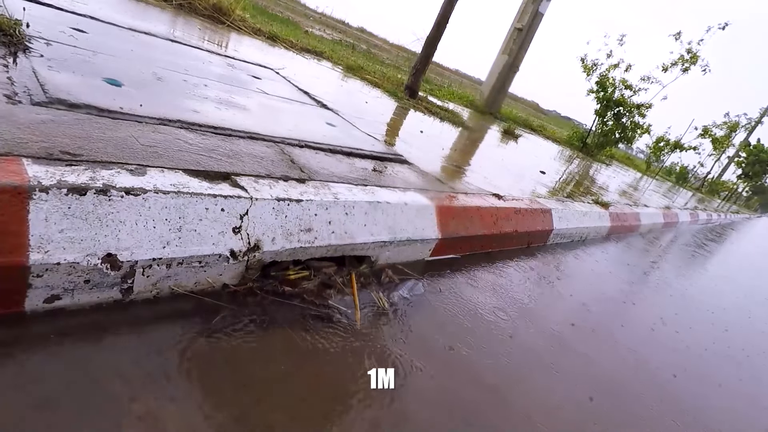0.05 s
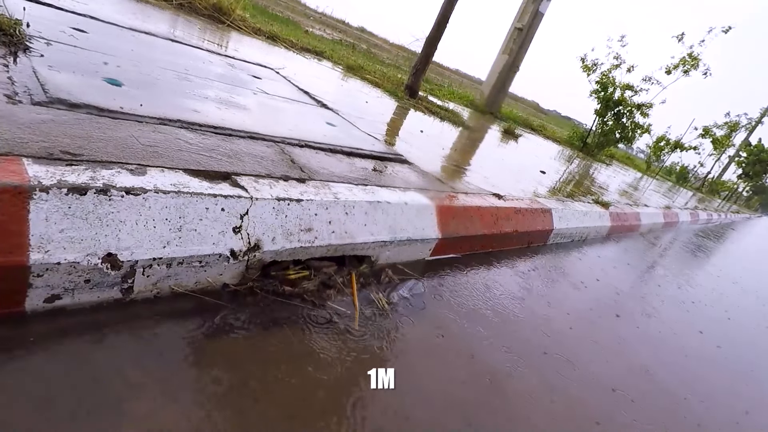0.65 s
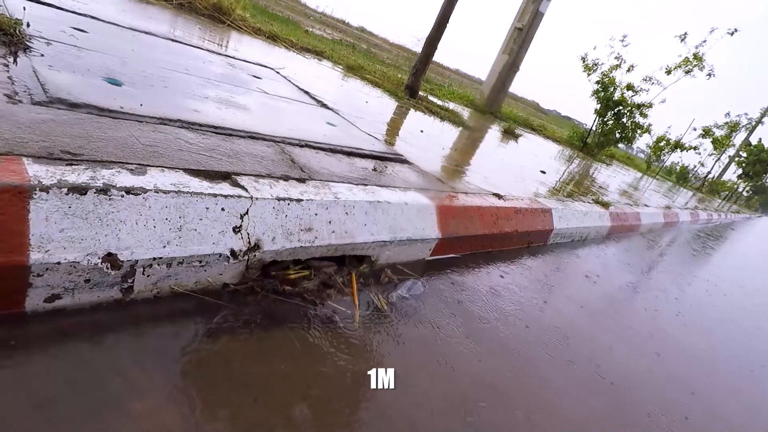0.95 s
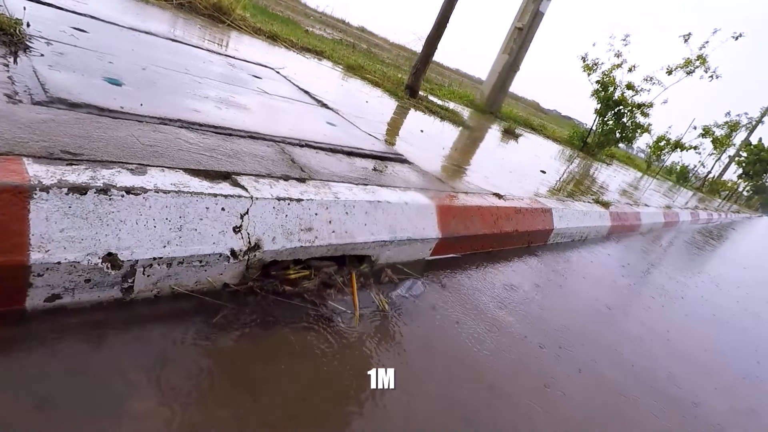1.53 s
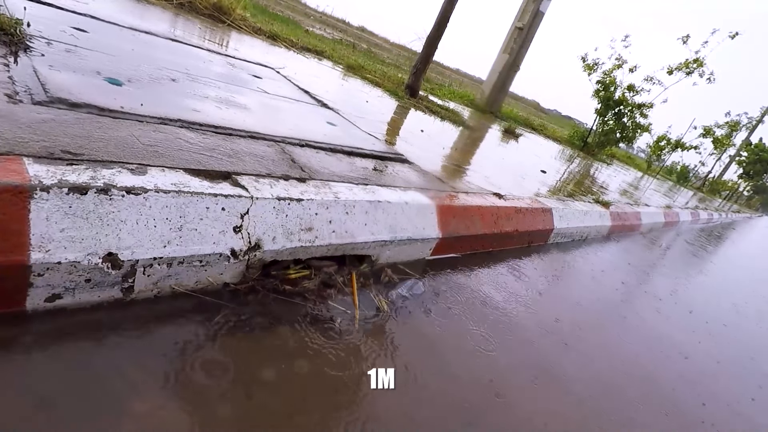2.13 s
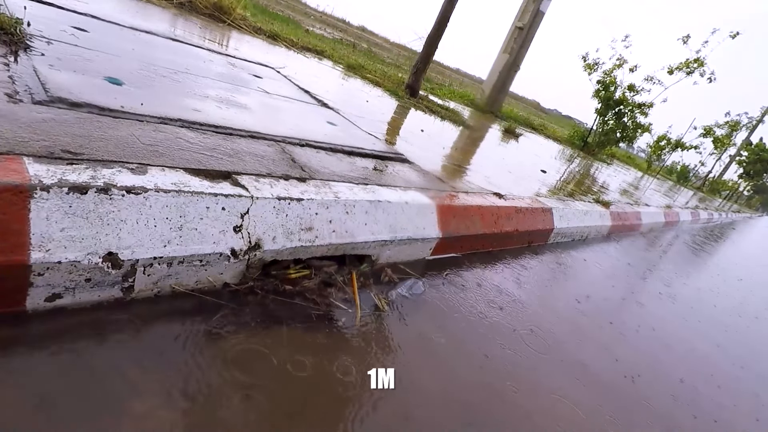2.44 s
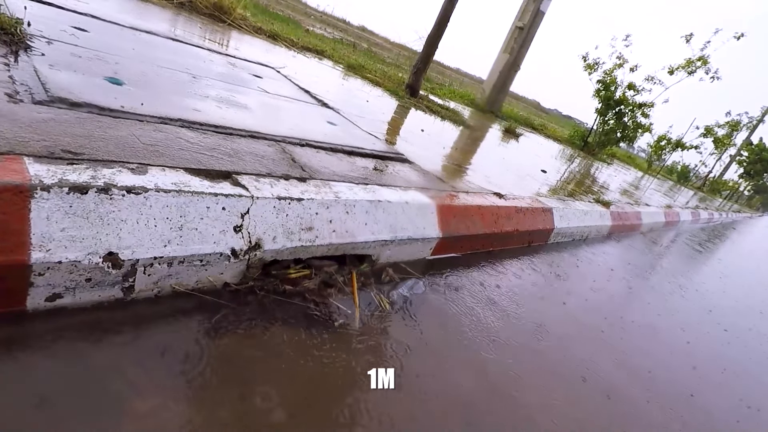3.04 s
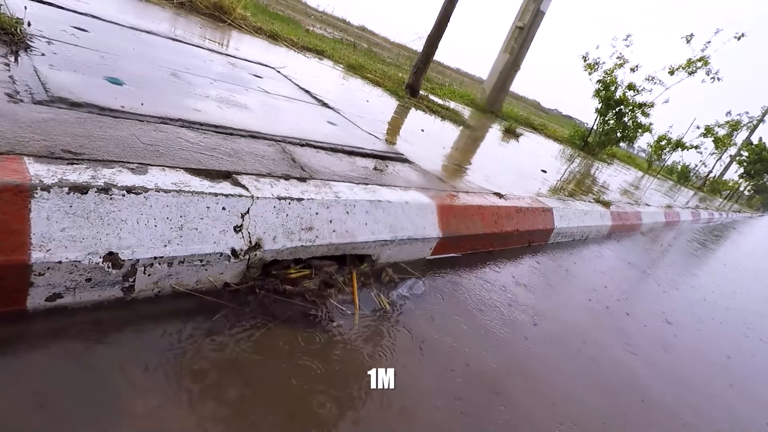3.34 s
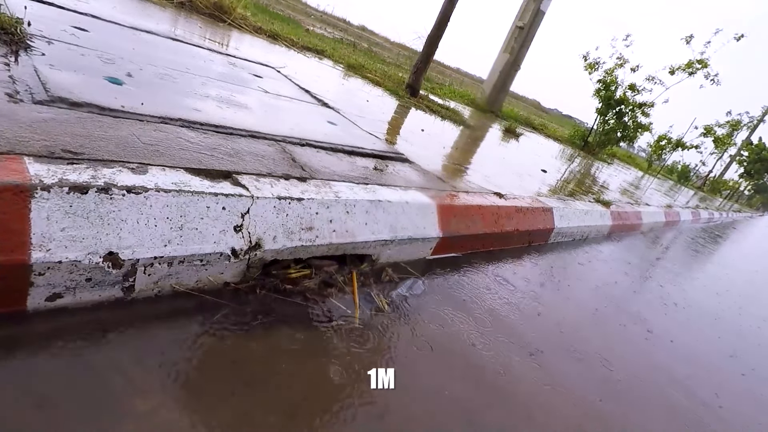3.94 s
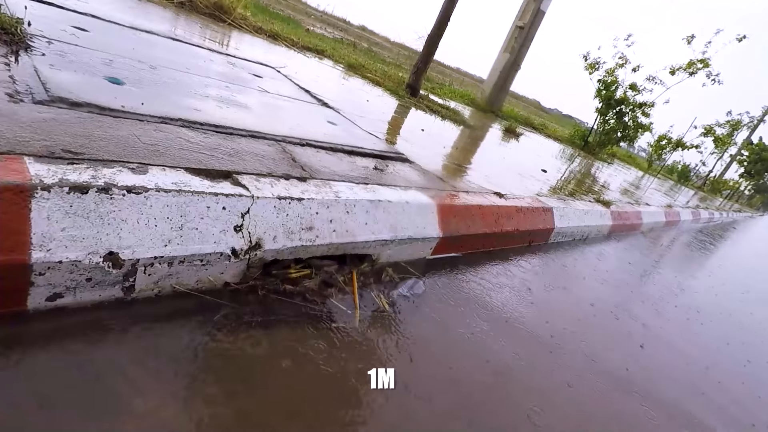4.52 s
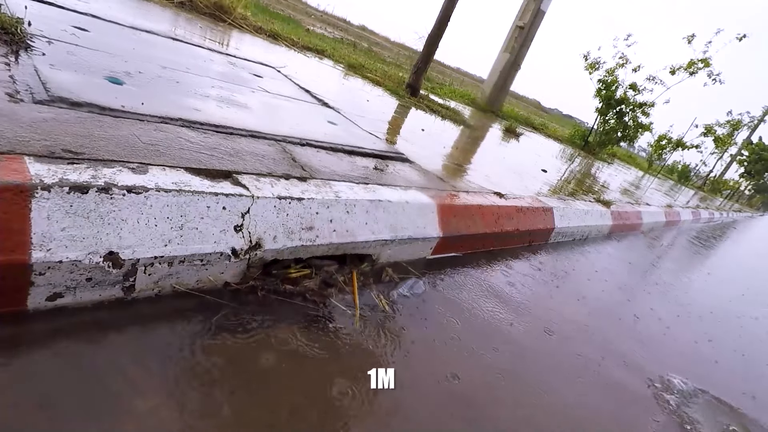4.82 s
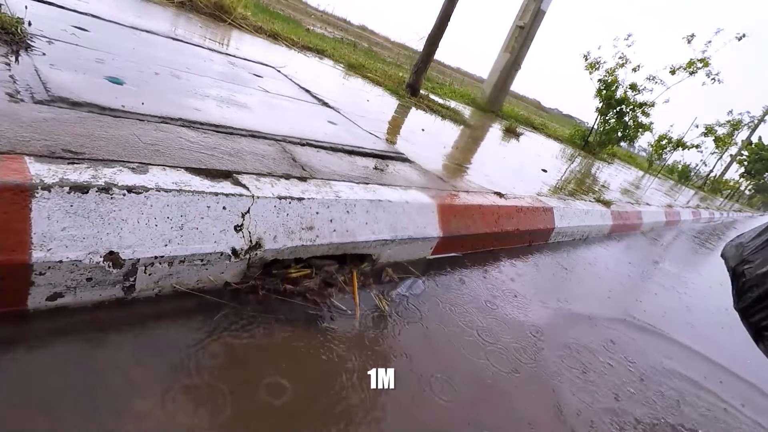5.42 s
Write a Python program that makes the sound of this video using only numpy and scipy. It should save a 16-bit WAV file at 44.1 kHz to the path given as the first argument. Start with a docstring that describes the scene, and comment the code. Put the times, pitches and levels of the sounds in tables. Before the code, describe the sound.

Light rain taps on a microphone held just above a flooded kerb. Behind the taps, water runs along the gutter, an engine idles low and tyres hiss on a distant wet road. After a quick, hard rattle the sound drops almost to nothing, then creeps back with trickling and bubbling at a drain. A breeze rumbles, and near the end a foot wades in with a plop and a wash of spray.

```python
"""A flooded kerb in light rain, heard from just above the water. Raindrops pat on the microphone
housing and ring it; after a quick, hard rattle the level collapses and creeps back, for a while in mono.
Water slides into the drain with ringing bubbles, and near the end a foot wades in with a plop and a
wash of spray. Behind it an exhaust throbs at idle, wet tyres hiss far off and a breeze rumbles."""
import sys
import numpy as np
from scipy import signal
from scipy.io import wavfile

SR = 44100
rng = np.random.default_rng(int(sys.argv[2]) if len(sys.argv) > 2 else 0)


def output_pcm(signal):
    """Save a mono or channel-first signal as 16-bit PCM at the path in sys.argv[1].

    Samples are clipped to [-1, 1] before scaling.
    """
    pcm = np.clip(np.atleast_2d(signal).T, -1, 1) * 32767
    wavfile.write(sys.argv[1], SR, np.round(pcm).astype(np.int16))


N = 245637
TIME = np.arange(N) / SR

# Drops on the housing (every pan is left minus right): start_s, relative_pat_db, pitch_hz,
# flat_pitch_ratio, fade_s, knock_db, ring_db, tick_db, tick_hz, thump_db, pan_db
HOUSING_DROPS = [(0.457,-15,913,0.65,0.00068,-27,-24,-22,3600,-38,-2),
                 (0.584,-24.5,2000,.9,0.0014,-33,-30,-21,4500,-41,0),
                 (0.704,-14,610,0.36,.0036,-21.5,-21.5,-20,3700,-42,-4.5),
                 (0.7805,-3,2550,.5,.0005,-12,-1.5,-20,9300,-11.5,11.5),
                 (0.8406,-11.5,634,0.38,.0026,-13.5,-21,-25,3700,-32,-7.5),
                 (0.915,-22,500,.33,.0019,-30,-24,-23,3750,-34,-8),
                 (1.112,-12.5,738,0.31,0.0043,-7.5,-15.5,-22,3600,-31,-4),
                 (1.2583,-20.5,903,.36,0.0055,-32,-25,-32.5,6440,-30,-3.5),
                 (1.4561,-10.5,1100,.33,0.00091,-21,-22,-19,3670,-22,-1),
                 (1.499,-14,2500,.4,0.00034,-31,-20.5,-21,4070,-11,9),
                 (2.462,2,787,0.34,0.0054,-35,-37,-28,3500,-26,-15),
                 (2.472,-16.5,928,.5,0.0035,-42,-47,-50,4000,-45,-6),
                 (2.826,-24.5,603,.33,.0024,-48,-48,-28,9000,-34,-1),
                 (2.904,-34,600,.33,.001,-53,-50.5,-21.5,9400,-40,0),
                 (2.9135,-13,614,0.35,0.0021,-36,-37,-16,9700,-20,-2),
                 (3.1853,-19.5,615,.33,0.0021,-41,-34,-20,9500,-24,3),
                 (3.212,-23.5,1060,0.41,.0013,-37,-37,-36,4300,-49,-1),
                 (3.599,-25,1640,0.53,0.0048,-22,-52,-34,4430,-24.5,-5),
                 (3.769,-13,710,0.3,0.00056,-56,-39,-27,7600,-45,2.5),
                 (4.1667,-28.5,900,.33,0.0014,-36,-43,-50,4000,-49,-7),
                 (4.477,-21.5,690,0.31,0.00084,-38,-33.5,-31,9800,-44,10.5),
                 (4.6429,-14,2850,0.72,0.0016,-11,-29,-15,3680,-51,-9),
                 (4.836,-27,1510,0.47,0.0055,-35,-31,-41,4000,-44,-6),
                 (5.3642,-17,940,.45,0.003,-32,-23.5,-24,3800,-44,-4)]
# Modes of the housing: pitch_hz, level_db, t60_s, port_phase_rad
HOUSING_MODES = [(1220, 4, 0.012, 2.6), (1720, -9, 0.01, 1.2), (2260, -1, 0.0071, 1.9),
                 (3000, -15, 0.0058, 0.54), (3460, -8.5, 0.0036, 0.34), (6450, -27, 0.0033, 0.74)]
# Growing bumps of the quick rattle: peak_s, bump_db, thud_db, ring_db
RATTLE_BUMPS = [(1.467, -11, -29.5, -35), (1.4777, -2, -15, -24), (1.4886, -2, -13, -20.5),
                (1.499, 2, -13.5, -22)]
# Close droplets on the puddle: start_s, level_db
PUDDLE_TICKS = [(.630, -35), (.755, -32), (1.195, -32.5), (1.661, -29), (1.703, -28.5), (1.767, -31),
                (1.806, -33)]
# Air pockets closing in the water: start_s, level_db, start_pitch_hz, fade_s
AIR_POCKETS = [(0.556, -21.5, 457, 0.0046), (0.934, -31.5, 453, 0.0095), (2.245, -25.5, 290, 0.009),
               (2.28, -15.5, 233, 0.0086), (3.588, -28, 1130, 0.0034), (3.865, -27.5, 457, 0.013),
               (3.928, -22, 642, 0.0054), (4.022, -28.5, 422, 0.012), (4.17, -19.5, 380, 0.0049),
               (4.208, -31.5, 525, 0.0086), (4.75, -22, 254, 0.0093), (4.762, -18.5, 845, .01),
               (4.887, -16.5, 443, 0.0017), (5.285, -38, 505, 0.02), (5.443, -23, 386, 0.0057)]
# Washes of pushed water: start_s, length_s, slosh_db, spray_db
WASHES = [(0.308, 0.027, -63, -53.5), (1.193, 0.11, -69, -56.5), (1.423, 0.028, -48, -54.5),
          (4.535, 0.34, -48.5, -62.5), (4.875, 0.075, -45, -53.5), (4.98, 0.053, -37.5, -48),
          (5.157, 0.37, -45, -56)]
# The washes lean to the right: frequency_hz, pan_db
WASH_PAN = [(60, -0.5), (99, -1.0), (160, -0.5), (270, -1.5), (450, -6.5), (740, 0), (1220, -7.5),
            (2010, -8.5), (3330, 0.5), (5500, -13), (9080, -9), (15000, 0.5)]
# Bouts of gurgling in the drain, and of thin high hiss: start_s, length_s, level_db
GURGLE_BOUTS = [(2.12, 0.23, -43), (3.62, 0.48, -54.5), (4.6, 0.16, -63), (5.25, 0.36, -57.5)]
HIGH_HISS_BOUTS = [(2.93, 0.3, -63.5), (3.75, 1, -80), (4.12, 0.15, -71), (4.97, 0.053, -59)]
# Exhaust orders: firing_rate_multiple, level_db
EXHAUST_ORDERS = [(.5, -25.5), (1, 5.5), (1.5, -27), (2, -13), (3, -14.5), (4, -18.5)]
# Tone colour of each noise layer: frequency_hz, relative_density_db
SLOSH_SPECTRUM = [(240, -29), (400, -9), (700, 4), (841, 3), (1100, -0.5), (1210, -0.5), (1650, -2),
                  (2250, -1.5), (3340, -14), (3720, -9), (4390, -17), (10100, -26), (13700, -35),
                  (15000, -49.5)]
SPRAY_SPECTRUM = [(1500, -9), (2800, -4.5), (3700, 1.5), (4600, -12), (6500, 12.5), (9500, -3.5),
                  (12000, -20.5), (15000, -34)]
TRICKLE_SPECTRUM = [(95, 11.5), (150, 14), (250, -2.5), (450, 7), (700, 1.5), (1100, -7), (1650, -4),
                    (2300, -6.5), (3500, -9.5), (4600, -8)]
GUTTER_SPECTRUM = [(120, -2.5), (250, -4.5), (420, -6), (700, -7), (1200, -9), (1900, -17), (2800, -28),
                   (3600, -26.5), (5500, -25), (9500, -31), (12000, -40.5), (15000, -50)]
TYRE_SPECTRUM = [(150, -40), (250, -6), (404, -6.5), (540, -7.5), (675, -10.5), (1070, -2.5), (1320, -10),
                 (1700, -6.5), (2750, -17), (3160, -26), (4300, -42), (7430, -28), (12400, -48.5),
                 (15000, -84.5)]
BREEZE_SPECTRUM = [(20, -3), (35, -0.5), (60, -6), (85, 3), (130, -4.5), (190, -15.5), (280, -15),
                   (500, -39)]
# Bands of falling spatter, high hiss and singing tread: centre_hz, width_hz, relative_db
SPATTER_BANDS = [(1770, 540, 0), (2740, 250, -4), (3700, 180, -3), (6800, 2400, -8.5)]
HIGH_HISS_BANDS = [(9640, 2400, 1), (12100, 2100, -14.5)]
TREAD_BANDS = [(819, 99, -14.5), (1070, 78, -6), (1213, 64, -11), (1421, 64, -9), (1690, 290, -12.5),
               (2105, 150, -17.5), (2850, 190, -20)]
# How alike left and right are in the noise layers: frequency_hz, correlation
STEREO_LIKENESS = [(60, 0.58), (130, 0.99), (290, 0.34), (640, -0.32), (1400, -0.19), (2300, 0.32),
                   (3300, 1), (5000, -0.64), (7000, 0.23), (15000, -0.63)]

BOUT_ATTACK_S, BOUT_RELEASE_S = 0.063, 0.035
IDLE_HZ, IDLE_CREEP_HZ_PER_S, ENGINE_DB, ENGINE_FADE_DB_PER_S = 53, .09, -28.5, 1.03
THROB_HZ, THROB_RAMP_S, THROB_DEPTHS = 7.1, (3.2, 4.2), (.08, 0.35)
COLLAPSE_S, RECOVERY_S, RECOVERY_POWER, TROUGH_RISE_S = 1.4995, 2.72, 2.81, 0.071
DUCK_DB, BASS_TROUGH_DB, TREBLE_TROUGH_DB = -12, -28, -25.5
CROSSOVER_HZ, CUTOFF_HZ = 240, 15300


def raindrops(tick_width, spread_s, tick_s, turn, thump_hz, thump_s):
    """A drop's pat falls in pitch as it flattens; the housing rings, then thumps, and the spray ticks."""
    out, t = np.zeros((2, N)), np.arange(SR // 20) / SR
    for s, db, hz, sag, fade, knock_db, ring_db, tick_db, tick_hz, thump_db, pan_db in HOUSING_DROPS:
        wobble = rms_one(band(rng.standard_normal(len(t)), 170, 370))   # the drop deforms unevenly
        pitch = hz * (sag + (1 - sag) * np.exp(-t / spread_s)) * (1 + 0.41 * (1 - sag) * wobble)
        landing = 1 - np.exp(-(t * hz * 3) ** 2)   # water lands softly
        pat = 1.456 * from_db(db) * landing * np.exp(-t / fade + 2j * np.pi * np.cumsum(pitch) / SR)
        thump = from_db(thump_db) * t / thump_s * np.exp(1 - t / thump_s + 2j * np.pi * thump_hz * t)
        body = housing(t, knock_db, ring_db, pan_db / 2) + at_ports(thump, pan_db / 2, turn=1.8)
        edges = tick_hz * np.exp([-tick_width, tick_width])
        burst = rng.standard_normal(len(t)) * np.exp(-t / tick_s)
        tick = from_db(tick_db) * band(band(burst, *edges), *edges)
        add(out, s, at_ports(pat, pan_db, turn) + body + tick)
    return out


def housing(t, knock_db, ring_db, pan_db):
    """A blow rings the housing; where it lands sets the lowest mode (knock) against the rest (ring)."""
    out = 0
    for k, (hz, db, t60, turn) in enumerate(HOUSING_MODES):
        attack = 1 - np.exp(-t * hz / .35)   # low modes start more softly
        decay = from_db((ring_db if k else knock_db) + db - 60 * t / t60)
        out = out + at_ports((-1) ** k * attack * decay * np.exp(2j * np.pi * hz * t), pan_db, turn)
    return out


def rattle(bump_hz, bump_s, overtone_hz, overtone_db, overtone_s, thud_hz, thud_s, turn):
    """A quick rattle of growing bumps; each swells and dies within milliseconds and rings briefly."""
    out, t = np.zeros((2, N)), np.arange(-SR // 100, SR // 100) / SR

    def pulse(db, hz, width_s):
        return from_db(db) * np.exp(2j * np.pi * hz * t) / np.cosh(t / width_s)

    for k, (s, bump_db, thud_db, ring_db) in enumerate(RATTLE_BUMPS):
        bump = pulse(bump_db, bump_hz, bump_s) + pulse(bump_db + overtone_db, overtone_hz, overtone_s)
        thud = pulse(thud_db, thud_hz, thud_s)
        add(out, s + t[0], (-1) ** k * at_ports(bump + thud, 0, turn))
        add(out, s, housing(t[t >= 0], ring_db, ring_db, 0))   # same ring colour as the raindrops
    return out


def buzz(level_db, low_hz, high_hz):
    """A short buzz between the bumps of the rattle."""
    start, end = RATTLE_BUMPS[1][0], RATTLE_BUMPS[-1][0]
    noise = rms_one(band(band(rng.standard_normal((2, N)), low_hz, high_hz), low_hz, high_hz))
    return from_db(level_db) * held(start, end - start, 0.004, .001) * noise


def plops(shed_db, scatter_s, scatter_octaves, count):
    """Big bubbles ring close by; each sheds a few short-lived ones that blur it."""
    out = np.zeros((2, N))
    for s, db, hz, fade in AIR_POCKETS:
        add(out, s, at_ports(from_db(db) * bubble(hz, fade, rise=0.047), 0, turn=-0.83))
        for when, size, place in rng.uniform(-1.4, 1, (count, 3)):
            small_hz = hz * 2 ** (size * scatter_octaves)
            small = from_db(shed_db + db / 2) * bubble(small_hz, fade * 0.44, rise=0.092)
            add(out, s + when * scatter_s, at_ports(small, 0, turn=np.pi * place))
    return out


def washes():
    """Pushed water sloshes; its spray hisses and spatters back onto the puddle."""
    start, length, slosh_db, spray_db = np.transpose(WASHES)
    spatter = resonate(clicks(per_s=630, spread_db=2.0), SPATTER_BANDS) * panned(-4.5)
    slosh = banded_noise(SLOSH_SPECTRUM, flicker_db=2.5, flicker_hz=45, pans=WASH_PAN)
    spray = from_db(-1) * banded_noise(SPRAY_SPECTRUM, flicker_db=3.5, flicker_hz=50, pans=WASH_PAN)
    return (bouts(zip(start, length, slosh_db)) * slosh
            + bouts(zip(start, length, spray_db)) * (spray + spatter))


def trickle(start_s, length_s, level_db, edge_hz, crackle_db):
    """Water spurts over debris in the drain: a rush with a firm top edge, and fine crackle above it."""
    lowpass = signal.ellip(6, 1, 50, edge_hz, fs=SR, output="sos")
    flow = banded_noise(TRICKLE_SPECTRUM, flicker_db=3.5, flicker_hz=30)
    rush = rms_one(signal.sosfilt(lowpass, flow)) * panned(-5.5)
    bursts = band(clicks(per_s=2200, spread_db=1.0), 5900, 8800)
    crackle = from_db(crackle_db) * rms_one(bursts) * panned(-12.5)
    spurts = from_db(2.1 * drift(55))
    return bouts([(start_s, length_s, level_db)]) * spurts * (rush + crackle)


def ticks(fade_s, pan_db):
    """Single droplets snap on the puddle close by."""
    out, t = np.zeros((2, N)), np.arange(SR // 50) / SR
    for s, db in PUDDLE_TICKS:
        burst = rng.standard_normal((2, len(t))) * np.exp(-t / fade_s)
        add(out, s, from_db(db) * band(burst, 4500, 8500))
    return out * panned(pan_db)


def engine(unsteady_db, wander):
    """Only the low exhaust orders carry; each wavers, and the hum throbs, lightly and then deeply."""
    firing_hz = IDLE_HZ + IDLE_CREEP_HZ_PER_S * TIME
    phase = 2 * np.pi * np.cumsum(firing_hz * (1 + wander * drift(4))) / SR
    hum = sum(from_db(db + unsteady_db * drift(21)) * np.sin(order * phase + rng.uniform(0, 2 * np.pi))
              for order, db in EXHAUST_ORDERS)
    throb_phase = 2 * np.pi * np.cumsum(THROB_HZ * (1 + .07 * drift(3))) / SR
    throb = 1 + np.interp(TIME, THROB_RAMP_S, THROB_DEPTHS) * np.sin(throb_phase)
    return from_db(ENGINE_DB - ENGINE_FADE_DB_PER_S * TIME) * throb * rms_one(hum)


def gutter(level_db, pan_db):
    """Water runs along the kerb in a steady, lightly flickering rush."""
    flow = banded_noise(GUTTER_SPECTRUM, flicker_db=1.0, flicker_hz=16)
    return from_db(level_db) * panned(pan_db) * flow


def gurgle(floor_db, count, low_hz, high_hz, fade_cycles, spread_db):
    """Small bubbles of random size ring in the drain, swelling in bouts."""
    cloud = np.zeros((2, N))
    for when, size, loud, place in rng.random((count, 4)):
        hz = low_hz * (high_hz / low_hz) ** size
        wave = from_db(spread_db * loud ** 2) * bubble(hz, fade_cycles / hz, rise=0.014)
        add(cloud, when * N / SR, at_ports(wave, 0, turn=np.pi * (2 * place - 1)))
    return (from_db(floor_db) + bouts(GURGLE_BOUTS)) * rms_one(cloud)


def tyres(traffic_db, car_db):
    """Tyres hiss on the wet road and their tread sings; one car passes over the far traffic."""
    level = from_db(traffic_db) + from_db(car_db) * swell(peak_s=0.093, width_s=1.62)
    hiss = banded_noise(TYRE_SPECTRUM, flicker_db=2.5, flicker_hz=27)
    tread = resonate(rng.standard_normal((2, N)), TREAD_BANDS)
    return level * rms_one(hiss + tread)


def breeze(floor_db, gust_db):
    """Air buffets the microphone ports, with one gust on top."""
    level = from_db(floor_db) + from_db(gust_db) * swell(peak_s=4.26, width_s=0.69)
    return level * banded_noise(BREEZE_SPECTRUM, flicker_db=3.5, flicker_hz=60)


def drizzle(level_db, spread_db, count):
    """Tiny drops tick on the puddle all around."""
    out = np.zeros((2, N))
    for when, size, loud, place in rng.random((count, 4)):
        hz = 3000 * 2.8 ** size
        tick = from_db(level_db + spread_db * loud ** 2) * bubble(hz, 1.4 / hz, rise=0.03)
        add(out, when * N / SR, at_ports(tick, 0, turn=np.pi * (2 * place - 1)))
    return out


def high_hiss(floor_db):
    """A thin, very high hiss comes and goes."""
    level = from_db(floor_db) + bouts(HIGH_HISS_BOUTS)
    return level * resonate(rng.standard_normal((2, N)), HIGH_HISS_BANDS)


def whistle(start_s, length_s, level_db, start_hz, fall_octaves_per_s, width_hz):
    """High in the hiss a thin band of noise slides down once."""
    pitch = start_hz * 2 ** (-fall_octaves_per_s * np.maximum(TIME - start_s, 0))
    phase = 2 * np.pi * np.cumsum(pitch) / SR
    tone = rms_one(drift(width_hz) * np.cos(phase) + drift(width_hz) * np.sin(phase))
    return from_db(level_db) * held(start_s, length_s, 0.018, 0.12) * tone


def bubble(hz, fade_s, rise):
    """A pocket of air rings and climbs in pitch as it nears the surface."""
    t = np.arange(int(min(7 * fade_s, .1) * SR) + 1) / SR
    attack = 1 - np.exp(-t * hz)
    return attack * np.exp(-t / fade_s + 2j * np.pi * hz * (t + rise * t * t / (2 * fade_s)))


def clicks(per_s, spread_db):
    """Droplets burst at random times, each with its own size and place."""
    born = rng.random(N) < per_s / SR
    size = from_db(spread_db * np.minimum(rng.exponential(1, N), 3))
    return born * size * rng.standard_normal((2, N)) + 1e-18


def banded_noise(spectrum, flicker_db, flicker_hz, pans=None):
    """Bands of stereo noise, each with its own level, flicker, width and pan; rms 1."""
    low, high = spectrum[0][0], spectrum[-1][0]
    edges = 18 * 2 ** (np.arange(26) / 2.55)
    out, white = 0, rng.standard_normal((2, 2, N))
    for k, hz in enumerate(np.sqrt(edges[1:] * edges[:-1])):
        if low < hz < high:
            mid, side = band(white[k % 2], edges[k], edges[k + 1])
            alike = np.clip(at_hz(STEREO_LIKENESS, hz), -1, 1)
            stereo = np.sqrt(1 + alike) * mid + np.sqrt(1 - alike) * side * [[1], [-1]]
            gain = from_db(at_hz(spectrum, hz) + flicker_db * drift(flicker_hz))
            out = out + gain * panned(at_hz(pans, hz) if pans else 0) * stereo
    return rms_one(out)


def resonate(x, bands):
    """Ring a bank of resonances, each at its own level."""
    return sum(from_db(db) * rms_one(band(x, hz - width / 2, hz + width / 2)) for hz, width, db in bands)


def band(x, low_hz, high_hz):
    """Butterworth band-pass."""
    edges = [low_hz, min(high_hz, SR / 2 - 1)]
    return signal.sosfilt(signal.butter(2, edges, "band", fs=SR, output="sos"), x)


def drift(rate_hz):
    """Smooth random modulation with a spread of 1."""
    pole = np.exp(-80 * np.pi * rate_hz / SR)   # runs at one step per 40 samples
    slow = signal.lfilter([1], [1, -2 * pole, pole * pole], rng.standard_normal(N // 40 + 2002))[2000:]
    return np.interp(np.arange(N) / 40, np.arange(len(slow)), rms_one(slow))


def held(start_s, length_s, attack_s, release_s):
    """Exponential attack up to the start, a hold at 1, exponential release."""
    before, after = np.maximum(start_s - TIME, 0), np.maximum(TIME - start_s - length_s, 0)
    return np.exp(-before / attack_s - after / release_s)


def swell(peak_s, width_s):
    """A smooth fade in and out; 1 at its peak."""
    return np.exp(-((TIME - peak_s) / width_s) ** 2)


def bouts(rows):
    """The envelope of a series of bouts that build, hold and die away, added by power."""
    return np.sqrt(sum((from_db(db) * held(s, length, BOUT_ATTACK_S, BOUT_RELEASE_S)) ** 2
                       for s, length, db in rows))


def collapse(fall_s, trough, back_s):
    """The level falls to almost nothing, rises to a low trough by back_s and creeps back to full."""
    since = np.maximum(TIME - COLLAPSE_S, 0)
    risen = np.exp(-np.maximum(back_s - TIME, 0) / TROUGH_RISE_S)
    recovery = (since / RECOVERY_S) ** RECOVERY_POWER
    return np.minimum(np.exp(-since / fall_s) + trough * risen + recovery, 1)


def at_ports(wave, pan_db, turn):
    """A complex wave reaches the two microphone ports, panned and turn radians apart."""
    return np.array([wave.imag, (wave * np.exp(-1j * turn)).imag]) * panned(pan_db)


def panned(pan_db):
    """Gains of the left and right channel."""
    return from_db([[pan_db / 2], [-pan_db / 2]])


def add(out, s, sound):
    """Mix a short sound in at time s."""
    at = max(round(s * SR), 0)
    out[:, at:at + sound.shape[-1]] += sound[..., :max(N - at, 0)]


def at_hz(points, hz):
    """Read a curve on a log-frequency axis."""
    frequencies, values = np.transpose(points)
    return np.interp(np.log(hz), np.log(frequencies), values)


def from_db(db):
    """Decibels to gain."""
    return 10 ** (np.asarray(db) / 20)


def rms_one(x):
    """Scale to unit power."""
    return x / np.sqrt(np.mean(x ** 2) + 1e-20)


def scene():
    """The dry mix: taps and rattle up front, water around them, the street behind."""
    hum = engine(unsteady_db=.7, wander=.005) * panned(-.8)
    drops = raindrops(tick_width=0.24, spread_s=0.003, tick_s=0.00056, turn=2.24,
                      thump_hz=188.0, thump_s=0.0021)
    bumps = rattle(bump_hz=750, bump_s=0.00055, overtone_hz=1380, overtone_db=-13, overtone_s=.0008,
                   thud_hz=230, thud_s=0.0011, turn=2.36)
    water = plops(shed_db=-25, scatter_s=0.017, scatter_octaves=0.3, count=6)
    water += trickle(start_s=1.72, length_s=0.565, level_db=-40.5, edge_hz=3850, crackle_db=-16.5)
    rain = ticks(fade_s=0.00081, pan_db=-8) + drizzle(level_db=-66, spread_db=4.0, count=70)
    wind = breeze(floor_db=-38.5, gust_db=-38.5)
    water += gutter(level_db=-45.5, pan_db=-2)
    water += gurgle(floor_db=-56, count=650, low_hz=247, high_hz=800, fade_cycles=5.4, spread_db=6.5)
    traffic = tyres(traffic_db=-55, car_db=-37.5)
    water += washes()
    hiss = high_hiss(floor_db=-69)
    bumps += buzz(level_db=-32, low_hz=1000, high_hz=1750)
    hiss += whistle(start_s=2.35, length_s=0.22, level_db=-66, start_hz=8850,
                    fall_octaves_per_s=0.72, width_hz=140)
    return drops + bumps + water + rain + hum + traffic + wind + hiss


def record(dry):
    """The level collapses and returns, the image narrows for a while, peaks clip and the top is cut."""
    mono = held(start_s=2.349, length_s=2.002, attack_s=0.068, release_s=0.34)
    image = (1 - mono) * dry + mono * dry[0]   # the left channel takes over both sides
    bass = signal.sosfilt(signal.butter(2, CROSSOVER_HZ, fs=SR, output="sos"), image)
    # the treble dips briefly after a hard drop
    duck = from_db(DUCK_DB * held(start_s=.785, length_s=0.035, attack_s=0.00058, release_s=0.038))
    bass_gain = collapse(fall_s=0.0095, trough=from_db(BASS_TROUGH_DB), back_s=1.68)
    treble_gain = collapse(fall_s=0.0052, trough=from_db(TREBLE_TROUGH_DB) * (1 - mono), back_s=1.825)
    heard = bass_gain * bass + duck * treble_gain * (image - bass)
    top_cut = signal.ellip(10, .1, 80, CUTOFF_HZ, fs=SR, output="sos")
    return signal.sosfilt(top_cut, np.clip(heard, -.94, .94))


dry = scene()
out = record(dry)
output_pcm(out)
```